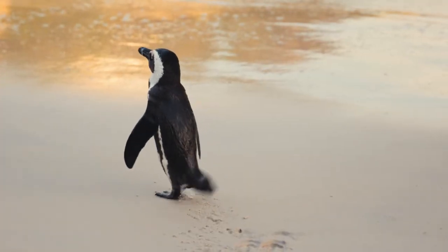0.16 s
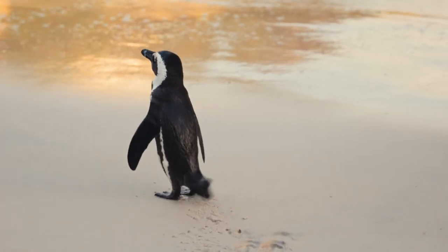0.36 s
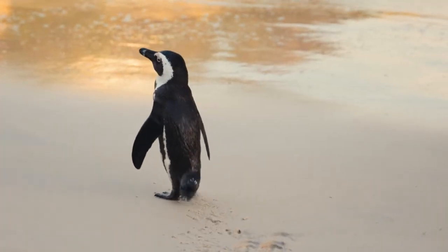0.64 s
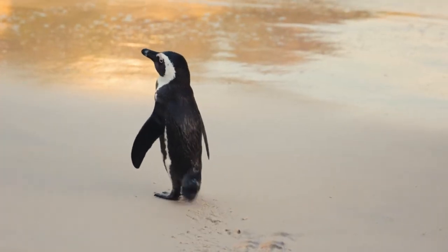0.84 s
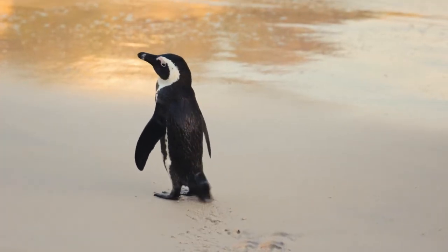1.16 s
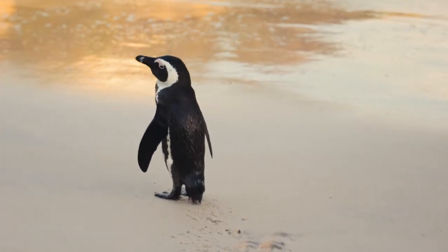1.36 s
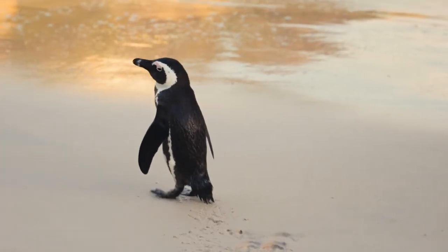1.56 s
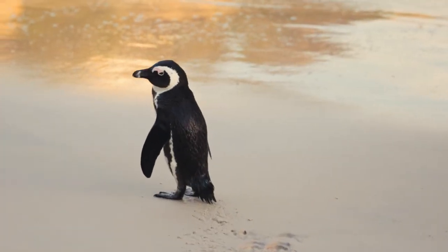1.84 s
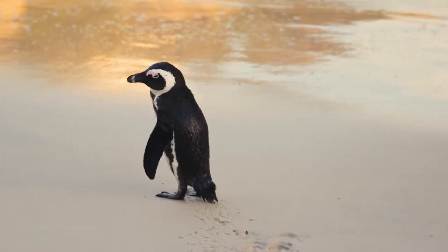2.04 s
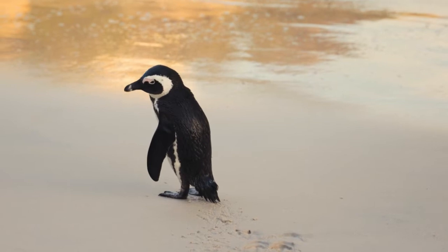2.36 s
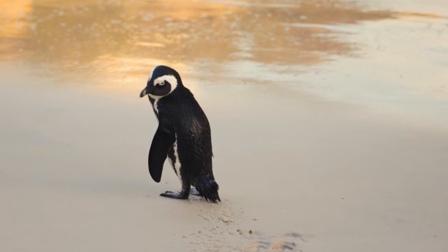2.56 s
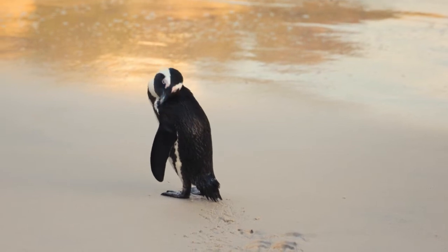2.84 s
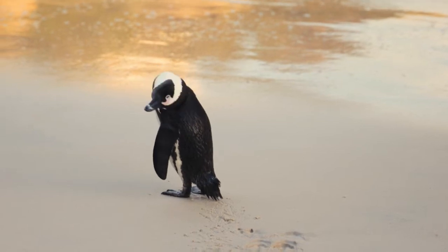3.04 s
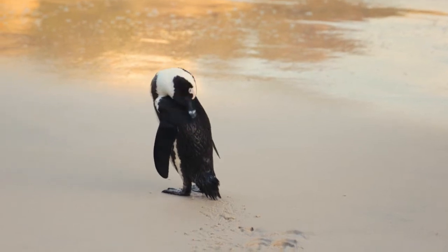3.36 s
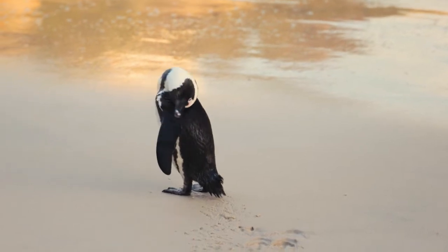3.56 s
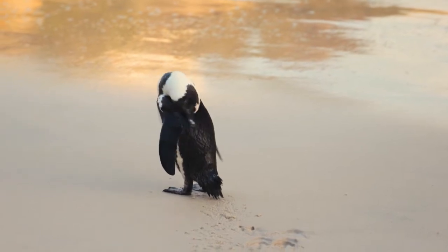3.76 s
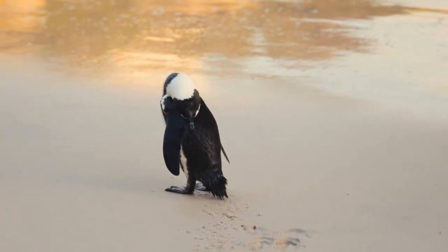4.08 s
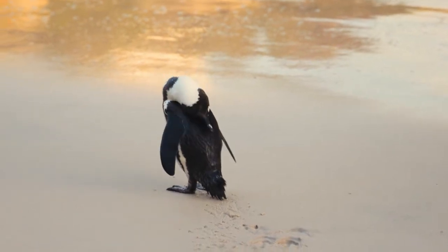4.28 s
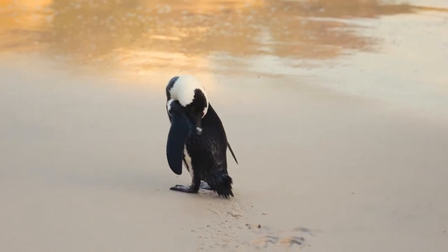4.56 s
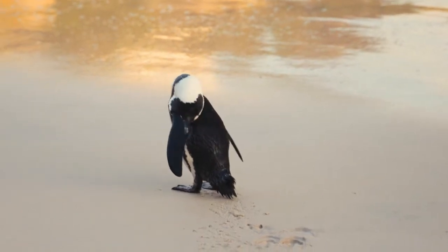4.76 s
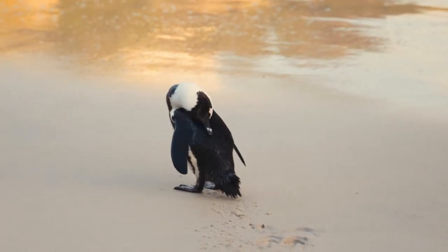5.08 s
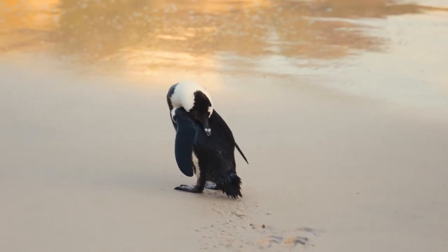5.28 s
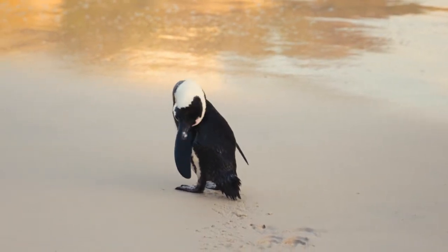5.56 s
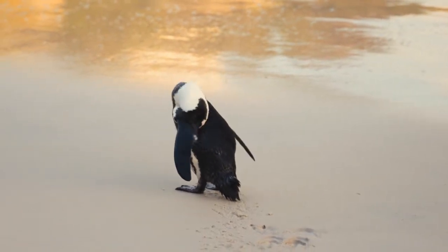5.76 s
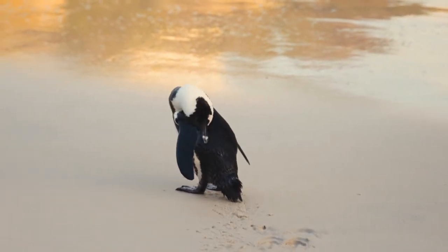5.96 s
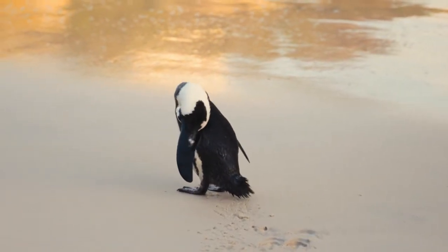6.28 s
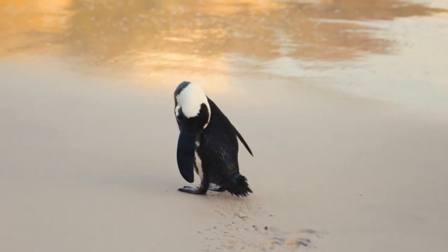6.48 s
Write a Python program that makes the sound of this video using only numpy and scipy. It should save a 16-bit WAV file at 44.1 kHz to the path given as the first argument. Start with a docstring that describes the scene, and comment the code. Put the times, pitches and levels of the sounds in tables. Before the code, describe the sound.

Penguin chicks peep close to the microphone in thin, gliding whistles, often two notes at once, over soft steady surf on a beach. An adult lets out a brief nasal squeak and a faint grunt. Then it brays three times, hoarse and stuttering, the last two loudest, with a clear squeak between them. The chicks keep peeping more quietly, and a distant colony murmurs faintly.

```python
"""Chicks peep close by, often two notes at once, over surf, a far colony's murmur and a faint mains hum.
Each peep is a gliding, nearly pure whistle. Then a penguin brays: hoarse out-breaths that catch some
twenty times a second, with clear squeaks between. The bray is a source and a filter: uneven pulses and
breath noise excite the resonances of the throat, and at a catch the voice chokes, often with a bright burst.
Small ticks sound nearby, and the near birds' calls scatter back off the beach as short, dull echoes."""
import sys
import numpy as np
from scipy import signal
from scipy.io import wavfile
from scipy.ndimage import uniform_filter1d

SR = 44100
rng = np.random.default_rng(int(sys.argv[2]) if len(sys.argv) > 2 else 0)


def master_out(mix):
    """Clip the mix to full scale and print it as 16-bit PCM to the path in sys.argv[1]."""
    frames = np.transpose(np.atleast_2d(mix))
    ceiling = np.clip(frames, -1, 1)
    pcm = np.round(ceiling * 32767).astype(np.int16)
    wavfile.write(sys.argv[1], SR, pcm)


N = 292202

# catches that end in a burst: (time [s], relative level [dB], resonance [Hz], burst length [s])
CATCHES = [(2.989, -36, 1994, 0.0083), (3.026, -36.5, 1699, 0.011), (3.47, -15, 1510, .013),
           (3.5, -15.5, 1570, .012), (3.685, -15.5, 1530, 0.014), (4.349, -10, 1650, 0.0083),
           (4.389, -9.5, 2000, 0.013), (4.4315, -16, 2020, 0.0095), (4.474, -8, 1880, .011),
           (4.511, -8.5, 1980, 0.012), (4.558, -9.5, 1430, 0.011), (4.599, -14.5, 1520, .013),
           (4.646, -35.5, 1440, .02), (4.69, -24.5, 1620, 0.0081), (4.722, -34, 1480, 0.016),
           (4.772, -31.5, 1400, .009), (4.81, -32.5, 1300, .012), (4.896, -36.5, 1960, 0.0059),
           (5.4, -13.5, 1670, 0.0078), (5.472, -9.5, 1630, 0.0099), (5.514, -6, 1930, .011),
           (5.553, -7, 1900, .011), (5.5978, -9, 1810, .012), (5.642, -10.5, 1820, .013),
           (5.6869, -10.5, 1926, .011), (5.7332, -10, 1856, .012), (5.778, -18, 1690, .011),
           (5.835, -18, 1670, .008), (5.887, -40.5, 1500, 0.011)]


def gain_of(db):
    """Amplitude ratio of a level in decibels."""
    return 10 ** (np.asarray(db) / 20)


def unit_rms(x):
    """Normalisation to unit mean power."""
    return x / np.sqrt(np.mean(x ** 2) + 1e-20)


def spectrum_at(points, hz):
    """Interpolation of a spectrum on a logarithmic frequency axis."""
    f, db = np.transpose(points)
    return np.interp(np.log(hz + 1), np.log(f + 1), db)


def curves(rows):
    """Linear interpolation of a table: the sample times and each further column."""
    times, *columns = np.transpose(rows)
    t = np.arange(round(times[0] * SR), round(times[-1] * SR)) / SR
    return t, [np.interp(t, times, column) for column in columns]


def add(mix, start_s, sound):
    """Superposition of a sound on the mix."""
    part = mix[max(round(start_s * SR), 0):][:len(sound)]
    part += sound[:len(part)]


def edges(count, fade_s):
    """Linear taper at both ends of a sound."""
    k = np.arange(count)
    return np.clip(np.minimum(k, count - k) / (fade_s * SR), 0, 1)


def wobble(count, smooth_s):
    """Low-pass noise: a random drift of unit rms."""
    size = int(smooth_s * SR) + 1
    return unit_rms(uniform_filter1d(uniform_filter1d(rng.standard_normal(count), size), size))


def resonate(x, modes):
    """Parallel resonators; neighbouring modes have opposite sign, as in a tube."""
    out = np.zeros(len(x))
    for k, (hz, width_hz, db) in enumerate(modes):
        b, a = signal.iirpeak(hz, hz / max(width_hz, 20), SR)
        out += (-1) ** k * gain_of(db) * signal.lfilter(b, a, x)
    return out


def surf():
    """Broadband noise whose spectrum fluctuates in faint patches of time and frequency."""
    spectrum = [(12, -63.5), (20, -25), (37, -16.5), (74, -9.5), (201, 1), (351, -4.5), (463, -12.5),
                (646, -4.5), (902, -10), (981, -8), (2450, -14), (2820, -15), (3830, -20), (14100, -25),
                (15400, -66)]  # (frequency [Hz], relative spectral density [dB])
    frames, hz = N // 256 + 5, np.fft.rfftfreq(1024, 1 / SR)
    real, imag, patches = rng.standard_normal((frames, 513, 3)).T
    patches = unit_rms(uniform_filter1d(uniform_filter1d(patches, 10, 0), 12, 1))
    bins = (real + 1j * imag) * gain_of(spectrum_at(spectrum, hz)[:, None] + 1.8 * patches)
    return gain_of(-57.5) * unit_rms(signal.istft(bins, nperseg=1024, noverlap=768)[1][:N])


def colony():
    """Many far voices sum incoherently to a throbbing noise with their formants."""
    envelope = [(0, -71), (1, -73.5), (1.9, -68), (2.05, -56), (2.3, -53.5), (2.45, -60), (3.3, -63.5),
                (3.76, -63), (3.85, -61.5), (4.15, -55), (4.93, -60.5), (5.9, -76), (6.3, -86), (6.63, -88)]  # (time [s], relative level [dB])
    formants = [(595, 360, 6), (1694, 870, 7.5), (2220, 320, 7.5)]  # (frequency [Hz], bandwidth [Hz], gain per pass [dB])
    level_db = np.interp(np.arange(N) / SR, *np.transpose(envelope)) + 3.8 * wobble(N, .012)
    murmur = resonate(resonate(rng.standard_normal(N), formants), formants)
    return gain_of(level_db - 2.5) * unit_rms(murmur)


def mains_hum(hz=49.6, rms_db=-76.5):
    """A pure tone at the mains frequency."""
    return np.sqrt(2) * gain_of(rms_db) * np.sin(2 * np.pi * hz * np.arange(N) / SR)


def ticks():
    """Puffs of noise excite broad resonances and decay exponentially."""
    puffs = [(1.058, -36, 3000, 0.02), (2.404, -38, 900, 0.024), (2.454, -36, 2530, 0.04),
             (2.482, -34.5, 2050, 0.042), (2.519, -37.5, 725, 0.03), (3.094, -44, 2225, 0.03),
             (3.13, -36.5, 2600, 0.072), (3.189, -48, 2980, 0.017), (3.372, -44.5, 6768, 0.026),
             (6.026, -38, 910, 0.094), (6.094, -44, 1000, 0.046), (6.464, -33.5, 1840, 0.026)]  # (time [s], relative level [dB], resonance [Hz], 60 dB decay time [s])
    out, t = np.zeros(N), np.arange(3000) / SR
    for start, db, hz, t60 in puffs:
        modes = [(hz, .15 * hz, 0), (2.2 * min(hz, 5000), hz, -22)]
        puff = unit_rms(resonate(rng.standard_normal(len(t)), modes))
        add(out, start, gain_of(db - 9 - 60 * t / t60) * puff * np.clip(t / .0015, 0, 1))
    return out


def echoes(x, t60=.09):
    """Diffuse reflection off rocks and other birds: convolution with a short, dull noise tail."""
    t = np.arange(6000) / SR
    tail = rng.standard_normal(len(t)) * gain_of(-60 * t / t60) * (t > .004)
    tail = signal.lfilter([1], [1, -.6], tail)
    return signal.fftconvolve(x, tail / np.linalg.norm(tail))[:N]


def chicks():
    """Whistles with weak harmonics glide, swell and fade; random modulation makes them flutter."""
    # (start [s], peak [s], end [s], first pitch [Hz], peak pitch [Hz], last pitch [Hz],
    #  peak level [dB], octave relative to the note [dB])
    peeps = [ (0.0, 0.01, 0.048, 3100, 3037, 2980, -56.5, -6),
             (.12, 0.18, 0.23, 2923, 3070, 2770, -49.5, -11),
             (.12, 0.167, 0.19, 4130, 4420, 4170, -53.5, -11),
             (.275, 0.295, 0.32, 4120, 4400, 4770, -57, -18),
             (0.289, 0.334, 0.39, 2944, 3103, 3046, -31, -28.5),
             (0.355, 0.395, 0.47, 3030, 2983, 2930, -39.5, -32),
             (0.437, 0.506, 0.57, 2930, 2970, 2616, -37, -15), (.45, 0.478, .5, 4425, 4870, 4760, -51, -33),
             (0.485, .52, 0.55, 4640, 4700, 4060, -53, -35), (.51, 0.542, 0.58, 4400, 3740, 3040, -45, -15),
             (.585, .619, 0.64, 2936, 2942, 2818, -62, -14), (.61, 0.679, .72, 3530, 3860, 3340, -60, -40),
             (.815, 0.877, 0.88, 2870, 2868, 2820, -63, -22),
             (1.075, 1.106, 1.154, 3720, 4300, 4450, -48.5, -10.5),
             (1.085, 1.134, 1.177, 2950, 2974, 2927, -35, -28),
             (1.22, 1.243, 1.38, 4400, 4370, 4800, -60.5, -9),
             (1.23, 1.277, 1.325, 2920, 2985, 2934, -35, -23),
             (1.315, 1.343, 1.4, 2870, 2870, 3030, -32.5, -31),
             (1.33, 1.358, 1.46, 4440, 4490, 4400, -54.5, -38),
             (1.39, 1.426, 1.465, 2750, 2580, 2530, -35.5, -27),
             (1.395, 1.414, 1.53, 4200, 3300, 3230, -37, -16),
             (1.548, 1.62, 1.67, 3202, 3310, 3073, -36.5, -21),
             (1.65, 1.685, 1.84, 3045, 3077, 2990, -57.5, -3.5),
             (1.71, 1.754, 1.84, 3620, 3900, 3640, -66, -25),
             (1.8, 1.837, 1.91, 3800, 4090, 3800, -67, -25),
             (1.89, 1.922, 2.13, 3872, 3858, 3330, -67.5, -25),
             (2.335, 2.353, 2.376, 3430, 3600, 3160, -53.5, -25),
             (2.555, 2.567, 2.58, 4364, 4320, 4640, -57, -30),
             (2.565, 2.595, 2.66, 3090, 3210, 2900, -51.5, -11),
             (2.593, 2.618, 2.61, 4900, 5320, 5000, -63.5, -30),
             (2.66, 2.675, 2.64, 5100, 5600, 5850, -69, -30),
             (2.68, 2.707, 2.735, 2800, 2900, 3070, -66, -20),
             (2.76, 2.786, 2.8, 3928, 4450, 4840, -61.5, -30),
             (2.77, 2.819, 2.885, 2954, 3110, 2800, -49, -17.5),
             (2.835, 2.848, 2.85, 5120, 4890, 4830, -64, -35),
             (2.935, 2.993, 3.02, 2880, 3090, 3080, -47.5, -6),
             (2.955, 2.987, 3.005, 5380, 4970, 5500, -52.5, -17),
             (3.0, 3.032, 3.06, 3135, 2894, 2770, -46, -18),
             (3.155, 3.163, 3.19, 3793, 4100, 4000, -62, -25),
             (3.155, 3.213, 3.255, 2940, 3036, 2790, -41.5, -12),
             (3.196, 3.205, 3.26, 4970, 4720, 4970, -48.5, -26),
             (3.212, 3.225, 3.22, 4782, 5025, 4400, -56, -31),
             (3.27, 3.31, 3.365, 3016, 3420, 3170, -67.5, -22),
             (3.797, 3.815, 3.84, 3780, 3680, 4350, -44, -20),
             (3.805, 3.87, 3.905, 2940, 3200, 2950, -54, -5),
             (3.835, 3.86, 3.875, 4350, 4900, 5350, -60, -30),
             (3.94, 3.998, 4.035, 3060, 3620, 3230, -48, -10),
             (3.98, 4.008, 4.035, 4900, 5380, 4720, -60, -35),
             (4.02, 4.08, 4.145, 3230, 3120, 2830, -45, -15),
             (4.025, 4.06, 4.097, 4720, 4900, 4650, -58, -40),
             (4.088, 4.104, 4.137, 4680, 4900, 4050, -59, -40),
             (4.115, 4.15, 4.172, 3000, 3500, 3300, -53, -25),
             (4.16, 4.18, 4.205, 3300, 3520, 3850, -48, -25),
             (4.19, 4.21, 4.245, 3800, 3800, 2850, -46, -25),
             (4.93, 4.962, 4.985, 3400, 3980, 4300, -57, -20),
             (4.945, 4.978, 5.015, 2900, 2890, 2858, -48, -10),
             (5.2, 5.24, 5.275, 3000, 3250, 3300, -60, -8),
             (5.218, 5.255, 5.29, 4200, 3650, 3400, -41, -22),
             (5.222, 5.275, 5.325, 2881, 2950, 2750, -50, -3),
             (5.272, 5.297, 5.345, 3400, 3480, 3050, -44, -15),
             (5.878, 5.892, 5.91, 3950, 3985, 4360, -55, -20),
             (5.895, 5.917, 5.95, 2946, 2833, 2930, -62.5, -1),
             (5.91, 5.931, 5.94, 4350, 3830, 3450, -48.5, -23),
             (5.93, 5.941, 5.99, 3700, 3330, 3350, -54, -13), ]
    steady_hz = 3150  # higher notes waver more, rasp and lose their third harmonic
    out, flutter, rasp = np.zeros(N), wobble(N, .009), wobble(N, .004)
    unsteady = gain_of(2.06 * wobble(N, .011) + .53 * wobble(N, .0015))
    for start, peak, end, first_hz, peak_hz, last_hz, db, octave_db in peeps:
        t, (position,) = curves([(start, -1), (peak, 0), (end, 1)])
        span = round(start * SR) + np.arange(len(t))
        rising, from_peak = position < 0, abs(position)
        glide = np.sin(np.pi / 2 * from_peak) ** 1.8
        hz = peak_hz + (np.where(rising, first_hz, last_hz) - peak_hz) * glide
        lost_db = np.where(rising, 18.5, 13.5) * from_peak ** 2.23
        excess_khz = max(peak_hz - steady_hz, 0) / 1000
        waver = (.0025 + .012 * excess_khz) * flutter[span]
        rasp_db = 2.5 * excess_khz * rasp[span]
        phase = 2 * np.pi * np.cumsum(hz * (1 + waver)) / SR
        third = gain_of(-30.5 - 40 * excess_khz) * np.sin(3 * phase)
        octave = gain_of(octave_db - .82 * lost_db) * np.sin(2 * phase)  # swells less than the note
        tone = gain_of(-lost_db) * (np.sin(phase) + third) + octave
        add(out, start, np.sqrt(2) * gain_of(db + rasp_db) * tone * edges(len(t), .0033))
    return out * unsteady


def squeaks():
    """Harmonic series, duller when softer; breath modulates each partial in amplitude and phase."""
    contours = [
        [(1.422, 605, -43), (1.442, 580.6, -21), (1.455, 594, -17.5), (1.468, 640, -23)],
        [(1.468, 636, -28.5), (1.482, 566.6, -18.5), (1.508, 545, -27), (1.522, 510, -53)],
        [(2.225, 327, -33), (2.241, 315.7, -37), (2.277, 305, -39)],
        [(2.284, 517, -42.5), (2.318, 514, -41.5), (2.345, 660, -46.5)],
        [(4.992, 500, -42), (5.0, 551, -26.5), (5.04, 569.3, -24), (5.125, 570, -24.5), (5.141, 536, -30.5),
         (5.16, 478, -57)],
        [(6.17, 562, -69), (6.194, 650, -51), (6.25, 597, -58.5)],
    ]  # per squeak: (time [s], pitch [Hz], level [dB])
    spectra = [
        [(1, -26.5), (2, -5.5), (3, 1.5), (4, -10), (5, -12), (6, -9), (7, -12), (8, -21), (9, -17.5),
         (10, -24), (11, -23.5), (12, -26), (13, -27.5)],
        [(1, -26), (2, -7), (3, 3.5), (4, -7.5), (5, -6), (6, -12), (7, -11), (8, -14), (9, -16), (10, -27),
         (11, -20.5), (12, -22), (13, -25), (14, -29.5)],
        [(1, -10), (2, -8), (3, -7.5), (4, -5.5), (5, 0), (6, -10), (7, -3), (8, -4), (9, -4), (10, -3.5),
         (11, -10), (12, -8), (13, -8), (14, -24), (15, -14), (16, -21), (17, -12), (18, -20), (19, -22),
         (20, -20), (21, -19), (22, -21), (23, -35), (24, -17.5)],
        [(1, -12), (2, -7), (3, 2), (4, -1), (5, -9), (6, -6), (7, -10), (8, -7), (9, -9), (10, -5), (11, -5),
         (12, -19), (13, -10.5)],
        [(1, -12.5), (2, -0.5), (3, 1.5), (4, -4.5), (5, -15), (6, -17.5), (7, -14.5), (8, -28.5), (9, -32),
         (10, -35), (11, -37.5), (12, -55), (13, -42)],
        [(1, -1), (2, 5.5), (3, 9), (4, -4)],
    ]  # per squeak: (harmonic number [1], relative level [dB])
    breaths = [0.39, 0.26, 0.31, 0.3, 0.052, 0.64]  # per squeak: (modulation depth [0-1])
    out = np.zeros(N)
    for contour, harmonics, breath in zip(contours, spectra, breaths):
        t, (hz, db) = curves(contour)
        cycles = np.cumsum(hz * (1 + .0033 * wobble(len(t), .0068))) / SR
        tilt_db_per_octave = .079 * (db - db.max())
        top, top_db = harmonics[-1]
        roll_off = [(top + j, top_db - 3.8 * j) for j in range(1, 9)]
        tone, power = np.zeros(len(t)), np.zeros(len(t))
        for k, harmonic_db in list(harmonics) + roll_off:
            amplitude = gain_of(harmonic_db + tilt_db_per_octave * np.log2(k * hz / 1500))
            slip = .23 * breath * k * wobble(len(t), .003)
            fuzz = breath * wobble(len(t), .0033) * np.cos(2 * np.pi * (k * cycles + rng.random()))
            tone += amplitude * (np.cos(2 * np.pi * k * cycles + .33 * k * k + slip) + fuzz)
            power += amplitude ** 2 / 2
        add(out, t[0], gain_of(db) * tone / np.sqrt(power) * edges(len(t), .0011))
    return out


def throat_filter(x, response):
    """Minimum-phase filter of unit energy: its phase is the Hilbert transform of its log gain."""
    hz = abs(np.fft.fftfreq(4096, 1 / SR))
    log_gain = np.log(gain_of(np.maximum(spectrum_at(response, hz), -100)))
    taps = np.fft.ifft(np.exp(np.conj(signal.hilbert(log_gain)))).real[:2048]
    return signal.oaconvolve(x, taps / np.linalg.norm(taps))[:len(x)]


def bursts(pulse_hz=385):
    """Transient excitation: at a catch a few quick, hard pulses drive the throat, then die."""
    response = [(100, -27), (230, -26), (385, -7), (770, -4.5), (1150, -5), (1550, -4.5), (1900, -4.5),
                (2300, -8), (2800, -5.5), (3200, -12), (3600, -11.5), (4600, -19), (6500, -28),
                (10000, -49.5), (14000, -89)]  # the throat in a burst: (frequency [Hz], relative gain [dB])
    drive, t = np.zeros(N), np.arange(1600) / SR
    k = np.arange(1, 29)[:, None]
    draws = rng.standard_normal((len(CATCHES), len(t) + 1))
    quirks = rng.standard_normal((len(CATCHES), len(k), 2))  # no two catches have the same timbre
    for (start, db, ring_hz, length), draw, quirk in zip(CATCHES, draws, quirks):
        rate_hz, noise = pulse_hz * (1 + .03 * draw[0]), draw[1:]
        cycles = rate_hz * (t - 1.5 * t ** 2) - .5  # the rate sags as the burst dies
        lift_db = 8 * np.exp(-((k * rate_hz - ring_hz) / 450) ** 2) + 2.2 * quirk[:, :1]
        smear = .14 * k * quirk[:, 1:]
        partials = gain_of(lift_db) * np.cos(2 * np.pi * k * cycles + smear)
        train = unit_rms(partials.sum(0)) + .4 * noise
        envelope = np.clip(t / .004, 0, 1) * np.exp(-(t / length) ** 3)
        add(drive, start - .002, gain_of(db) * envelope * train)
    return gain_of(-13.5) * throat_filter(drive, response)


def choke(catch_depth_db=15):
    """Amplitude modulation of the voice: a Gaussian dip in level at each catch."""
    silent_catches = [(2.071, 14, .006), (2.1, 6, 0.0027), (2.13, 10, 0.0039), (2.168, 15, 0.0076),
                      (2.203, 8.5, 0.0031), (3.546, 12, 0.0048), (3.574, 7, 0.0029), (3.614, 9.5, 0.00387),
                      (3.647, 6.5, 0.0059), (4.229, 7.5, 0.0038), (5.445, 6.5, 0.0076)]  # (time [s], depth [dB], half width [s])
    dip_db, t = np.zeros(N), np.arange(-800, 800) / SR
    for time, _, _, length in CATCHES:
        add(dip_db, time + t[0], -catch_depth_db * np.exp(-((t / length - .2) / .4) ** 2))
    for time, depth_db, width_s in silent_catches:
        add(dip_db, time + t[0], -depth_db * np.exp(-(t / width_s) ** 2))
    return gain_of(dip_db)


def pitch_climb(t, depth=.068, climb_s=.045):
    """Frequency modulation: a pitch factor that drops at each burst and climbs back."""
    times = np.sort([0] + [row[0] for row in CATCHES])
    since_s = t - times[np.searchsorted(times, t, "right") - 1]
    return 1 + depth * (uniform_filter1d(np.minimum(since_s / climb_s, 1), size=200) - .5)


def voice_pulses(cycles, hz, tilt_db_per_octave):
    """Harmonics nearly in phase sum to one sharp pulse a cycle; each wavers as the throat shifts."""
    out = np.zeros(len(cycles))
    for k in range(2, 30):
        level_db = tilt_db_per_octave * np.log2(k * hz / 1500) + 1.8 * wobble(len(cycles), .01)
        slip = .012 * k * wobble(len(cycles), .006)  # higher harmonics lose step
        out += gain_of(level_db) * np.cos(2 * np.pi * k * cycles + slip)
    return out * np.sqrt(4 * hz / SR)


def voice_source(cycles, hz, tilt_db_per_octave, breath, crossover_hz=3200):
    """Mixed excitation: pulses and breath below the crossover, pitch-synchronous noise puffs above."""
    shimmer = gain_of(1.3 * wobble(len(hz), .004))
    puffs = unit_rms((.87 + np.exp(-(cycles % 1) / .049)) * rng.standard_normal(len(hz)))
    voiced = (1 - breath) * shimmer * voice_pulses(cycles, hz, tilt_db_per_octave) + breath * puffs
    low_pass = signal.butter(2, crossover_hz, fs=SR)
    hiss = puffs - signal.filtfilt(*low_pass, puffs)
    return signal.lfilter(*low_pass, voiced) + 2.02 * shimmer * hiss


def brays():
    """Source and filter: the voice rings the throat over a clean fundamental; lower is softer, duller."""
    contours = [
        [(2.05, 254.7), (2.12, 265.5), (2.176, 226.6), (2.23, 240)],
        [(2.97, 210.5), (3.024, 222.6), (3.05, 210)],
        [(3.414, 237.3), (3.46, 256), (3.52, 261), (3.6, 246.4), (3.678, 239.2), (3.716, 224.5), (3.75, 213)],
        [(4.208, 234.2), (4.242, 268.7), (4.28, 282.8), (4.297, 275), (4.338, 289.5), (4.414, 274.2),
         (4.54, 280.1), (4.614, 248.2), (4.66, 225)],
        [(4.645, 226), (4.69, 231), (4.716, 231.8), (4.802, 223.2), (4.91, 217.5)],
        [(5.348, 209.2), (5.38, 268.8), (5.424, 295.7), (5.526, 285.4), (5.79, 251.5), (5.83, 201.4),
         (5.88, 186.7)],
    ]  # per bray: (time [s], base pitch [Hz])
    # per bray, at top pitch and before the level slope acts: (throat drive [dB], fundamental [dB],
    # spectral tilt [dB/octave], level slope [dB/s], release [s])
    efforts = [(-44, -44, 5, 68, 0.0066), (-49.5, -50.5, 6, 3, 0.011), (-33, -34, -3.5, 11.5, 0.04),
               (-22, -29.5, -1, -9, 0.027), (-32, -41.5, 7, -120, 0.028), (-21.5, -30, 1, -4, 0.031)]
    throats = [
        [(240, -53), (400, -3), (561, 11), (945, -2.5), (1550, -1), (3130, -9.5), (4010, -23.5), (9000, -36),
         (11700, -64), (19800, -120)],
        [(240, -34), (400, 0), (3020, -15), (4000, -48), (5200, -65), (8800, -120)],
        [(240, -52), (400, -4), (806, -10), (1170, 0.5), (1690, 2), (2340, -7), (3100, -12), (4340, -24.5),
         (6680, -33), (7440, -46), (8390, -41), (10000, -64), (13000, -78), (22000, -120)],
        [(240, -55), (400, -6), (823, -9.5), (1160, 6.5), (1510, -6), (2460, -7.5), (3160, -12), (4790, -33),
         (5130, -38), (6590, -40), (11000, -61.5), (14300, -90), (22000, -120)],
        [(240, -55), (400, -11.5), (1420, -1), (2410, -26), (2940, -23.5), (9000, -52), (11700, -66),
         (19800, -120)],
        [(240, -45), (400, -1), (492, -4.5), (811, -4), (1130, 6.5), (1360, -4), (2050, 1.5), (2830, -12.5),
         (3290, -20.5), (4110, -21.5), (5060, -36), (5500, -32.5), (11000, -64), (14300, -75), (22000, -120)],
    ]  # response per bray: (frequency [Hz], relative gain [dB])
    breaths = [.1, .3, .14, .2, .4, .1]  # per bray: (share of breath noise [0-1])
    out, choking = np.zeros(N), choke()
    for contour, effort, throat, breath in zip(contours, efforts, throats, breaths):
        drive_db, fundamental_db, tilt, slope, release_s = effort
        t, (hz,) = curves(contour)
        octaves = np.log2(hz / hz.max())  # zero at the top pitch, negative below
        trend_db = slope * (t - t[0])
        gate = choking[round(t[0] * SR):][:len(t)]
        jitter = .006 * wobble(len(t), .005)
        bend = pitch_climb(t) + jitter + .17 * (1 - gate)  # choking tightens the voice
        cycles = np.cumsum(hz * bend) / SR
        drive = voice_source(cycles, hz, tilt + 6 * octaves, breath)
        voice = throat_filter(drive * gate * gain_of(drive_db + 43.5 * octaves + trend_db), throat)
        fundamental_rms = gain_of(fundamental_db + 16 * octaves + np.minimum(trend_db, 0)) * gate ** 2.6
        fundamental = np.sqrt(2) * fundamental_rms * np.sin(2 * np.pi * cycles - .8)
        release = np.clip((t[-1] - t) / release_s, 0, 1) ** 2
        add(out, t[0], (voice + fundamental) * release * edges(len(t), .004))
    return out


def scene():
    """Superposition of the birds' direct sound, their reflections and the background."""
    catches, young = bursts(), chicks()
    small_body = signal.butter(2, 130, "high", fs=SR)  # radiates no deep bass
    adult = signal.lfilter(*small_body, catches + brays() + squeaks())
    reflections = gain_of(-22) * echoes(adult) + gain_of(-21) * echoes(young)
    return (adult + young + reflections + ticks() + surf() + colony() + mains_hum())[None]


def record(dry):
    """Band limiting by a linear-phase low-pass filter."""
    taps = signal.firwin(511, cutoff=15100, window=("kaiser", 9), fs=SR)
    return signal.oaconvolve(dry, taps[None], "same")


dry = scene()
out = record(dry)
master_out(out)
```